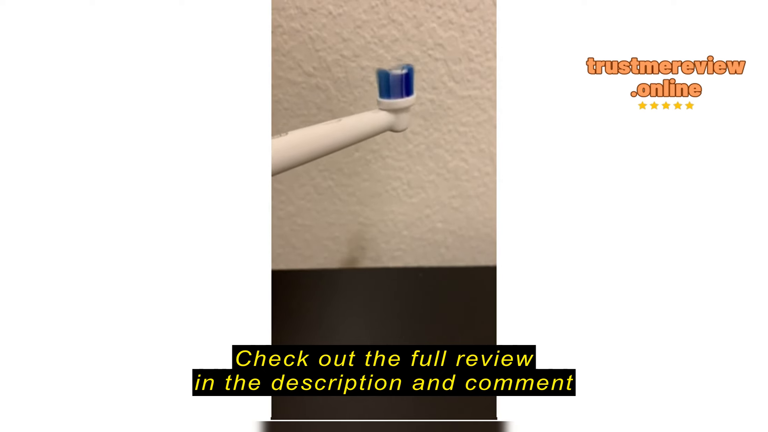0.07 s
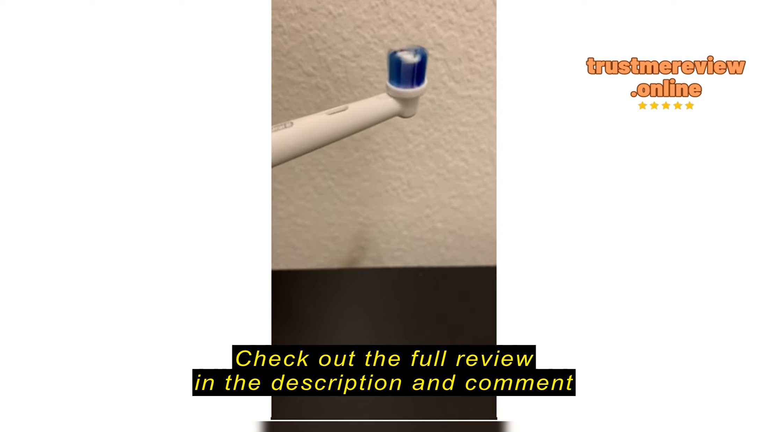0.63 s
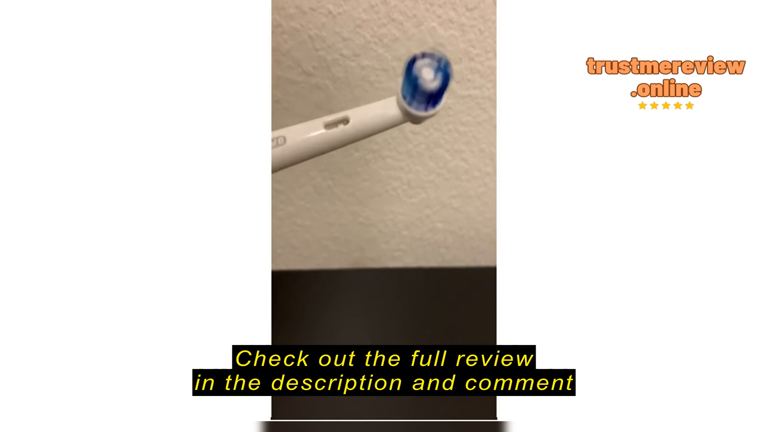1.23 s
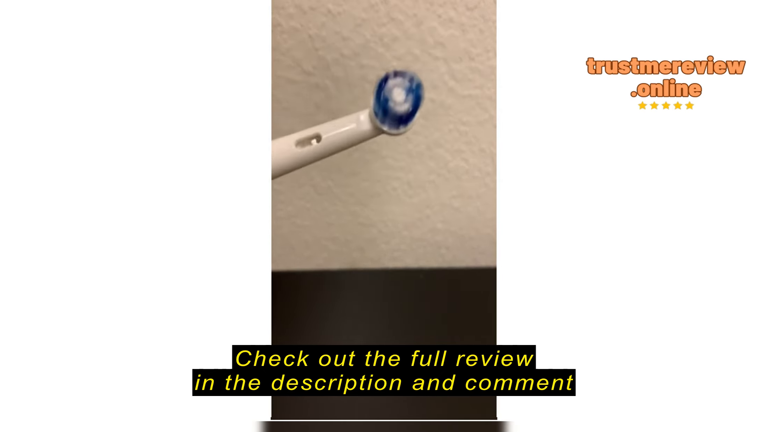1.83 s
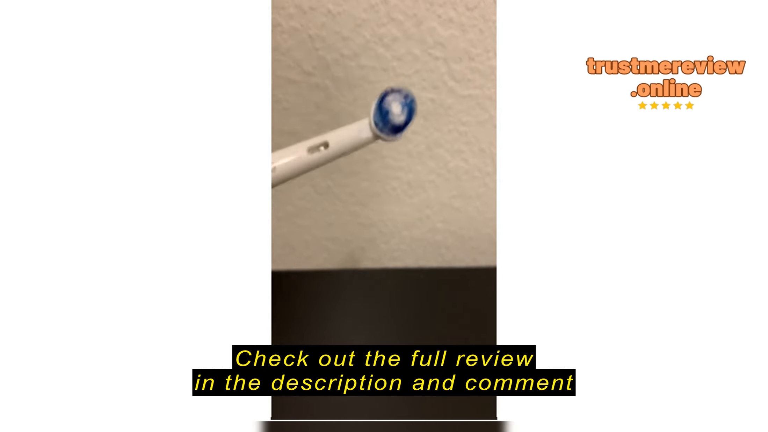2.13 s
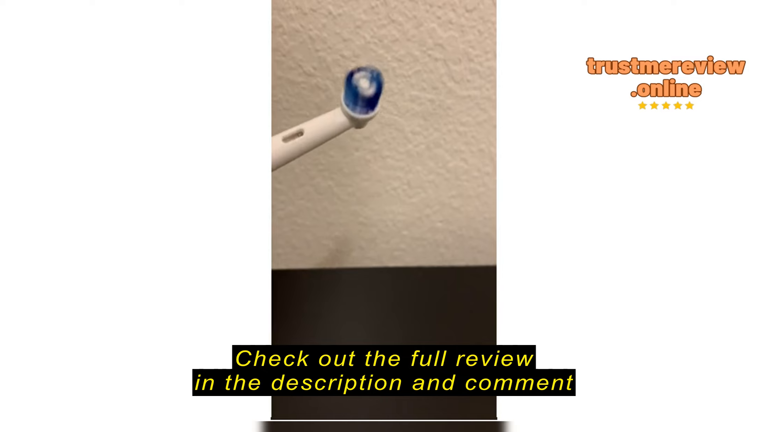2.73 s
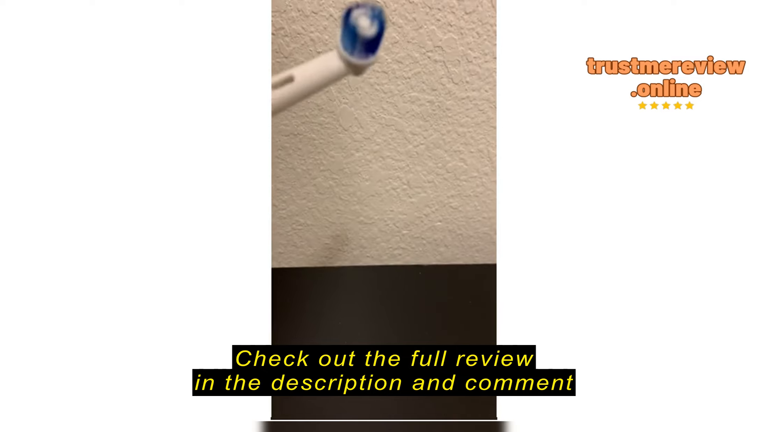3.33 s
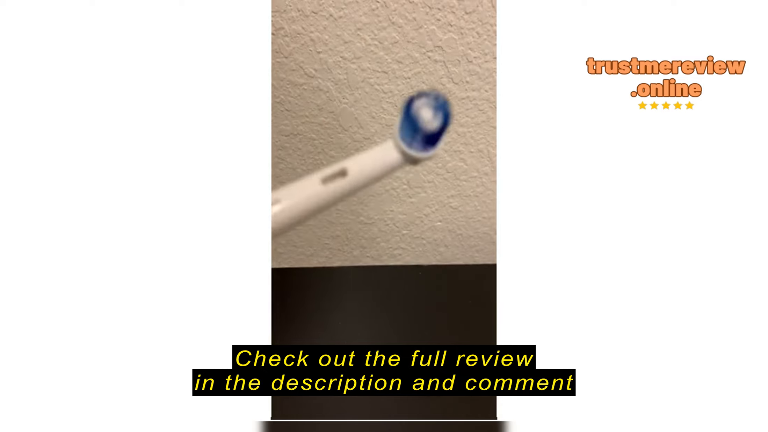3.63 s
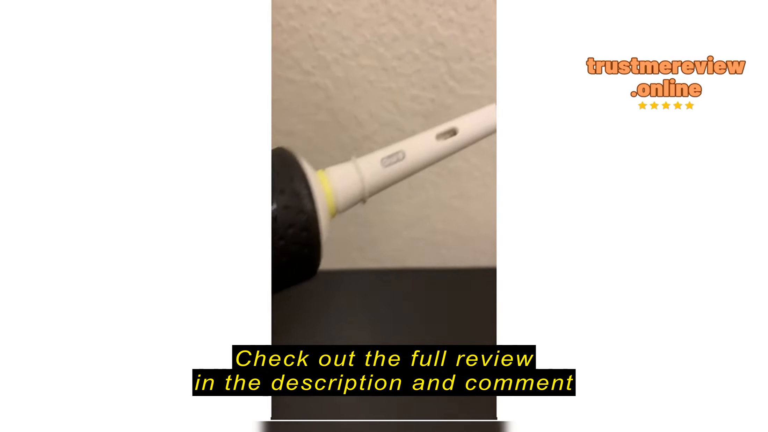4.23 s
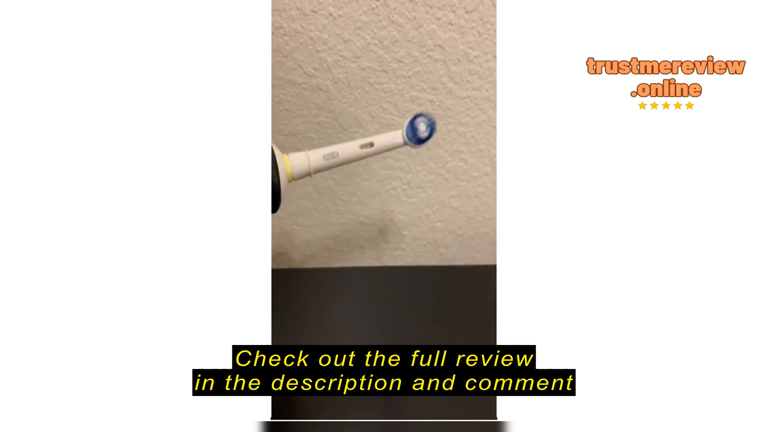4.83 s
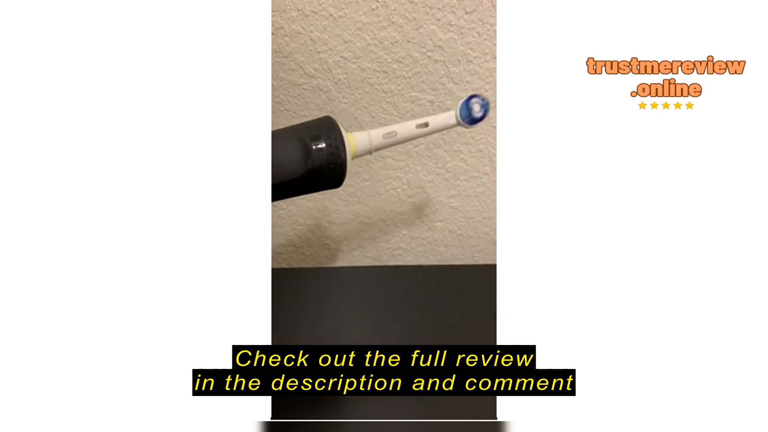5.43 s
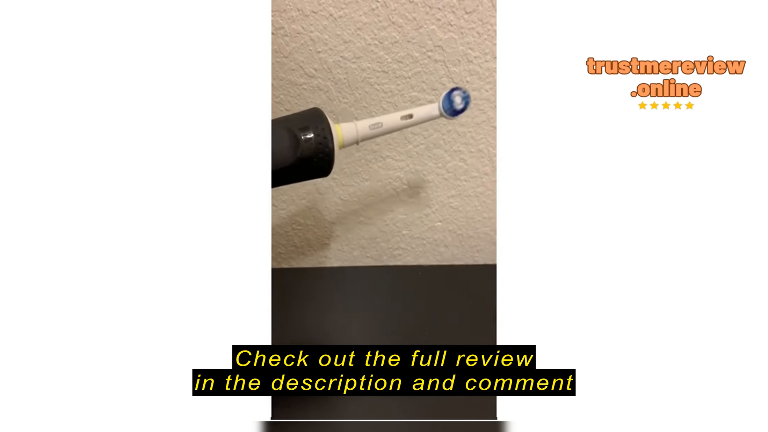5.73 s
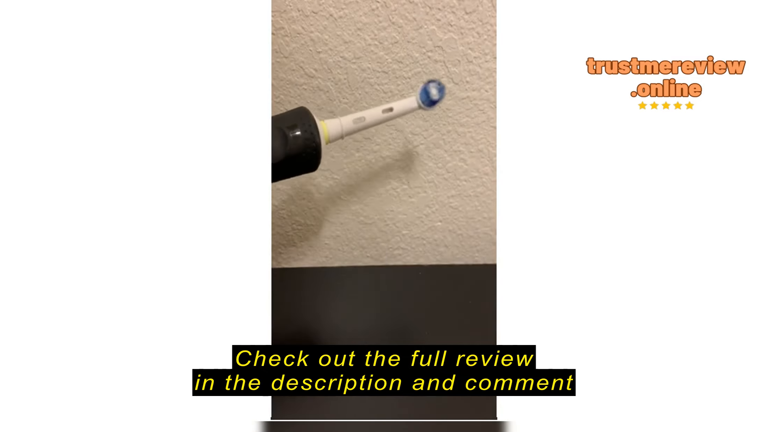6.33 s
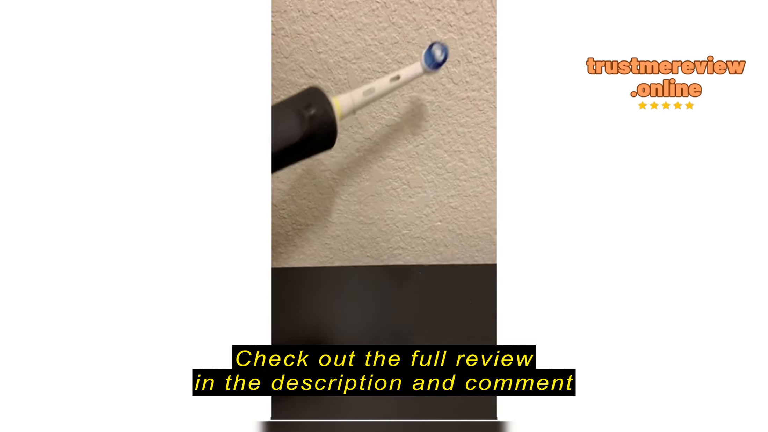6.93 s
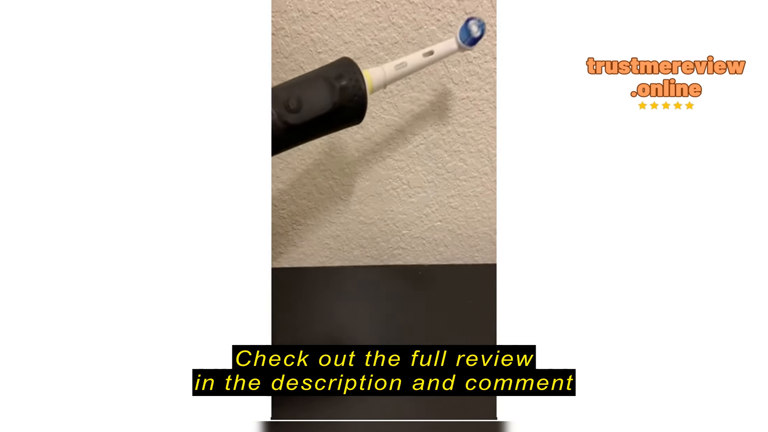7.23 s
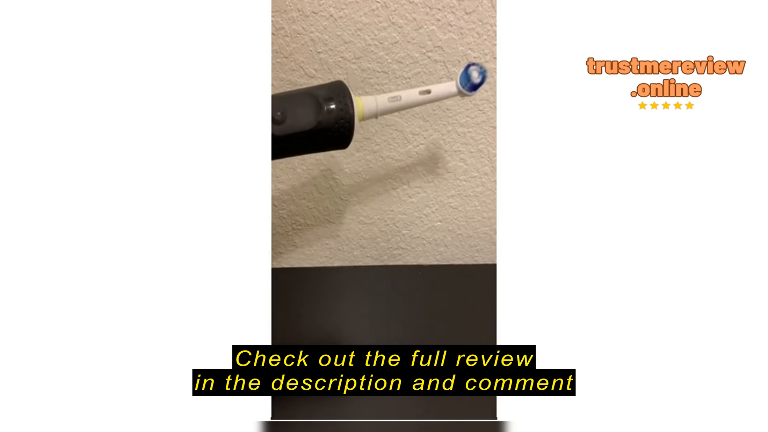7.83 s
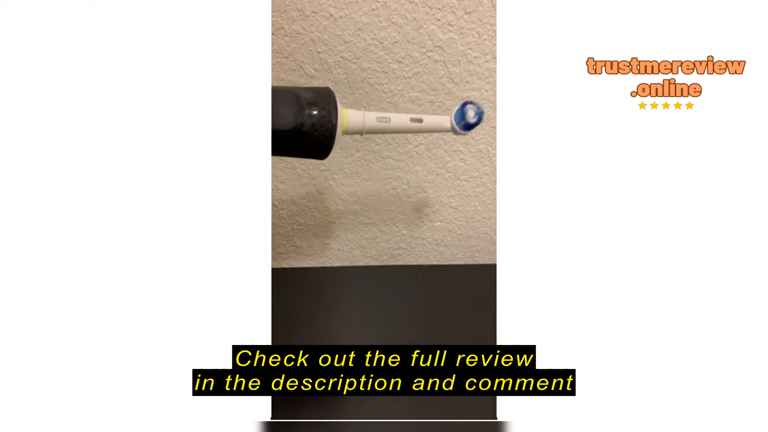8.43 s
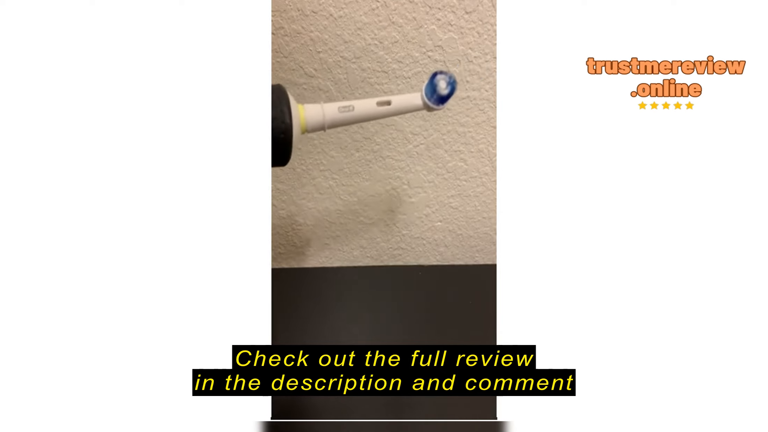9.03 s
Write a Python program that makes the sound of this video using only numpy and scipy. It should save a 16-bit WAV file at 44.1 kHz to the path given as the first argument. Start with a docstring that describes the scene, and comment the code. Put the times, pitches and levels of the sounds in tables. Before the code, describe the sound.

An electric toothbrush buzzes steadily up close, with a fast rattle and a thin hiss.

```python
"""An electric toothbrush runs in a hand, close to a phone, over low room rumble.
It spins up at once to about 72 turns a second: the handle hums at twice that rate, the housing buzzes
on higher orders, the linkage clatters in its play, stem and brush head ring, the bristles hiss.
It is slowly turned: the head faces the microphone from 1 s, the side from 3.5 s, the handle near 6 s.
From about 7.5 s the handle is held level, and sounds quieter."""
import sys
import numpy as np
from scipy import signal
from scipy.fft import rfft, irfft, next_fast_len
from scipy.io import wavfile
from scipy.ndimage import uniform_filter1d, map_coordinates

SR = 44100
rng = np.random.default_rng(int(sys.argv[2]) if len(sys.argv) > 2 else 0)


def master_out(mix):
    """Clip the mix to full scale and print it as 16-bit PCM to the path in sys.argv[1]."""
    frames = np.transpose(np.atleast_2d(mix))
    ceiling = np.clip(frames, -1, 1)
    pcm = np.round(ceiling * 32767).astype(np.int16)
    wavfile.write(sys.argv[1], SR, pcm)


N = 405279

# Drive speed. Each row: time in seconds, turns per second.
DRIVE_SPEED = [(0.3, 71.9), (1.0, 71.94), (1.3, 71.78), (1.55, 71.81), (1.8, 71.67), (2.1, 71.76),
               (2.3, 71.66), (2.55, 71.79), (3, 71.86), (3.75, 71.82), (4.65, 71.96), (5, 71.91),
               (5.9, 71.68), (6.2, 71.7), (6.55, 71.81), (8.3, 71.78), (8.6, 71.72), (9.19, 71.71)]
# What faces the microphone. Each row: time in seconds, aspect (0 head, 1 side, 2 handle, 3 held level).
ASPECT = [(0, 1.2), (1.0, 0.061), (2.8, 0.13), (3.5, 1.1), (4.1, 1.02), (5.3, 1.31), (6.2, 1.91),
          (7.1, 2.44), (7.7, 3.2), (9.2, 3.7)]
# How strongly the brush's sound reaches the microphone.
# Each row: time in seconds, gain in dB before each part's falloff factor.
LOUDNESS = [(0, 0), (1.8, 0.53), (4.3, -0.5), (6.1, -2.5), (7.1, -1.7), (7.7, -5), (8.5, -4.5), (9.2, -4.5)]
# Housing tones. Each row: order of the drive, then level in dB at aspects 0 to 3.
DRIVE_TONES = [(3, -59.0, -58.5, -58.0, -58.0), (4, -70.5, -61.5, -55.5, -58.5),
               (5, -69.0, -63.0, -55.0, -67.0), (6, -62.0, -81.0, -81.0, -69.0),
               (7, -49.0, -54.5, -48.5, -53.0), (8, -49.5, -51.0, -49.0, -53.5),
               (9, -72.5, -71.0, -63.5, -64.5), (10, -59.5, -62.5, -53.0, -56.0),
               (11, -64.5, -62.0, -60.0, -61.5), (12, -55.5, -56.0, -54.0, -55.0),
               (13, -58.5, -72.5, -64.0, -51.5), (14, -52.5, -61.5, -51.5, -60.0),
               (15, -54.0, -63.0, -51.0, -49.5), (16, -55.5, -66.5, -48.0, -54.5),
               (17, -48.5, -66.5, -56.0, -67.0), (18, -55.0, -53.5, -60.5, -58.5),
               (19, -59.5, -68.0, -57.0, -61.5), (20, -67.0, -61.5, -55.0, -51.0),
               (24, -47.0, -51.0, -59.5, -56.5), (25, -58.5, -55.5, -50.0, -52.0),
               (26, -51.0, -55.0, -50.5, -68.0), (27, -45.5, -50.5, -45.5, -46.0),
               (28, -61.5, -58.0, -48.5, -43.5), (29, -55.5, -50.0, -50.0, -52.0),
               (30, -58.0, -51.0, -53.5, -61.0), (31, -46.5, -54.0, -57.0, -51.0),
               (33, -58.5, -54.0, -68.0, -51.5), (34, -57.5, -50.0, -53.5, -53.0),
               (35, -60.0, -57.0, -49.5, -56.5), (36, -45.0, -61.5, -59.0, -52.5),
               (37, -50.5, -58.0, -50.5, -47.5), (38, -57.5, -55.5, -58.5, -48.5),
               (39, -51.0, -44.0, -56.0, -39.0), (40, -54.5, -48.5, -60.5, -52.5),
               (41, -57.5, -50.0, -57.5, -55.5), (42, -60.5, -50.0, -54.5, -55.5),
               (43, -56.5, -48.5, -50.5, -55.0), (44, -47.5, -49.0, -51.0, -57.5)]
# Linkage contacts. Each row: position in turns, then force in dB on head, rattle, bristles, housing.
CONTACTS = [(.18, -4, -3, 1, 0), (.34, -13, -11, -11, -11), (.69, -7, -.5, -4, -7), (.8, 1, -3, -2, 2),
            (.9, -1, 2.5, .5, -1)]
# Noise spectra. Each row: frequency in Hz, relative density in dB.
BEARING_SPECTRUM = [(100, -30), (180, -3), (260, -6), (400, -14.5), (520, 6), (650, -2.5), (850, -0.5),
                    (1250, 0.5), (1500, 0.5), (2200, -16.5)]
RASP_SPECTRUM = [(1100, -42), (1550, -0.5), (1800, 5), (2000, 7.5), (2350, 5), (2800, 4.5), (3200, 2),
                 (3700, 2), (5000, -46)]
RATTLE_SPECTRUM = [(2400, -54), (3300, -2), (3900, 8), (4500, 6.5), (5000, 0.5), (5500, 8), (5950, -1.5),
                   (7000, 2.5), (7550, 1.5), (8100, -0.5), (8600, -27.5), (9400, 1), (10500, -14),
                   (13000, -42)]
BRISTLE_SPECTRUM = [(6500, -18), (8000, 0), (8450, 7), (8950, 1.5), (9400, 3.5), (9950, 2), (10450, 4.5),
                    (11200, -1), (13000, -2), (15000, -0.5), (15800, -11)]
ROOM_SPECTRUM = [(20, -36), (40, -38), (62, 1.5), (85, -4.5), (125, 7), (180, 1.5), (260, -8.5), (500, -16),
                 (2000, -12.5), (16000, -32)]
# Rings of the hollow stem, and three shifting treble peaks. Each row: time in seconds, centre in Hz, relative
# level in dB.
STEM_RING = [(0.0, 2770, -37), (0.12, 2900, -30.5), (0.45, 2790, -38.5), (1.1, 2740, -39),
             (1.6, 3260, -37.5), (3.2, 3240, -43), (3.7, 2940, -39.5), (4.1, 2980, -37), (4.5, 2920, -38),
             (4.9, 2850, -38.5), (5.2, 3140, -46), (5.68, 3180, -34.5), (5.95, 3100, -53), (6.6, 2900, -46),
             (7.0, 2820, -42), (7.5, 2630, -45.5), (8.3, 2860, -42.5), (9.19, 2820, -49)]
PEAK_LOW = [(0, 4950, -9), (1.3, 5030, -19), (1.65, 5100, -8), (2.1, 4950, -6), (3.4, 4950, -12),
            (4.1, 5000, -16), (4.6, 5000, -17), (5.25, 5150, -3), (5.9, 5050, -13), (6.25, 4300, -5),
            (6.9, 4300, -17), (7.7, 4670, -12)]
PEAK_MID = [(0, 6320, -4), (1.0, 6490, -4), (1.8, 6150, -2), (3.1, 6250, -5), (3.7, 6350, -13),
            (4.2, 6200, -12), (4.55, 6330, -5.5), (5.3, 6300, -2), (6.1, 6170, -3), (6.3, 6300, -6),
            (6.7, 6250, -5), (7.05, 6230, -10.5), (7.33, 6630, -3.5), (7.5, 6930, -4), (7.6, 6200, -5),
            (7.75, 6300, 0.5), (8.1, 6450, -4), (8.35, 6350, -12)]
PEAK_HIGH = [(0, 7440, -19), (1.1, 7530, -6.5), (1.9, 7550, -2), (2.9, 7620, -5), (3.35, 7300, -5.5),
             (3.5, 6900, -5), (3.95, 6820, -0.5), (4.35, 6950, -17), (5.4, 7350, -15), (5.85, 7350, -1.5),
             (6.1, 7330, -0.5), (6.25, 7000, -8), (6.55, 7040, -7), (6.9, 6800, -4), (7.1, 7450, -19),
             (7.45, 7400, -4), (7.8, 7400, -18)]
# Brush head ring. Each row: time in seconds, level in dB.
HEAD_LEVEL = [(0, -41), (0.6, -35.5), (1.2, -29.5), (2.9, -28), (3.9, -33.5), (4.35, -42), (4.8, -34),
              (5.15, -52), (5.6, -40), (6.05, -48), (6.6, -38), (7.6, -47), (8.5, -40.5), (9.19, -45)]
# Brush head modes. Each row: centre in Hz, width in Hz, relative level in dB.
HEAD_MODES = [(3545, 210, 0), (3742, 60, -3)]
# Brush head radiation. Each row: frequency in Hz, relative gain in dB.
HEAD_RADIATION = [(2400, -20), (3100, -6), (3350, 1), (3820, 0), (3980, -6), (5500, -18)]
# Echoes off wall, desk and hand. Each row: delay in seconds, level in dB against the direct sound.
ECHOES = [(.0007, -18), (.0015, -14), (.0024, -13), (.0037, -13)]
# Stereo spread. Each row: frequency in Hz, angle from mid towards side in radians.
STEREO_SPREAD = [(60, 0.061), (140, 0.0047), (280, 0.18), (520, 0.32), (1000, 0.66), (2000, 0.51),
                 (2800, 0.56), (3650, 0.78)]
# Likeness of side and mid, 90 degrees apart in phase. Each row: frequency in Hz, likeness from -1 to 1.
STEREO_LIKENESS = [(150, .96), (600, -.6), (1100, -.15), (1600, -.15), (2000, .35), (2900, .4), (3400, .92),
                   (3800, .96), (4400, .55), (5600, .7), (7600, .75), (10000, .4)]
# Stereo balance. Each row: frequency in Hz, left minus right in dB.
STEREO_TILT = [(150, 0), (300, -0.8), (520, 0), (750, -1), (1200, -0.8), (2300, -1.3), (3300, 0)]

# Levels at aspects 0 to 3.
HUM_DB, BEARING_DB = (-47.5, -48, -45.5, -48), (-46.5, -47.5, -40.5, -41.5)
RASP_DB, LINKAGE_DB = (-38, -40, -39, -39), (-30.5, -29.5, -29, -30)
BRISTLE_DB = (-31, -31.5, -30.5, -32.5)

ON_HEAD, ON_RATTLE, ON_BRISTLES, ON_HOUSING = range(4)  # force columns of CONTACTS
SPIN_UP_S, START_DEFICIT_HZ, START_DEFICIT_DB = .055, 3.0, 6
START_TURN, HEAD_STOP_TURN = .67, .79
TOP_HZ = 15850
FRONT_ONLY = np.array([[1], [0]])  # dry channels: front, sides


def amp(db):
    return 10 ** (np.asarray(db) / 20)


def unit(x):
    """Each channel at rms 1."""
    return x / np.sqrt(np.mean(x ** 2, axis=-1, keepdims=True) + 1e-20)


def along(points, hz):
    """Interpolate (Hz, value) points on a log axis."""
    knots_hz, values = np.transpose(points)
    return np.interp(np.log(hz + 1), np.log(knots_hz + 1), values)


def curves(rows):
    """One value per sample for each column after the time."""
    times_s, *columns = np.transpose(rows)
    return [np.interp(np.arange(N) / SR, times_s, column) for column in columns]


def wobble(knots_per_s):
    """Smooth random curve."""
    coarse = np.arange(0, N + 256, 256)
    knots = rng.standard_normal(int(N * knots_per_s / SR) + 4)
    return np.interp(np.arange(N), coarse, map_coordinates(knots, [coarse * knots_per_s / SR]))


def filtered(x, response):
    """Apply a frequency response."""
    size = next_fast_len(N + SR // 4, real=True)
    return irfft(rfft(x, size) * response(np.fft.rfftfreq(size, 1 / SR)), size)[..., :N]


def coloured(x, spectrum):
    """Shape x by a spectrum; rms 1."""
    return unit(filtered(x, lambda hz: amp(along(spectrum, hz))))


def ring(x, hz, width_hz, order=2):
    """Resonance with a movable centre; rms 1. Order 1 starts sharply, order 2 has steep flanks."""
    carrier = np.exp(2j * np.pi * np.cumsum(hz * np.ones(N)) / SR)
    pole = np.exp(-np.pi * width_hz / SR)
    baseband = signal.lfilter([1], np.poly([pole] * order), x / carrier)
    return unit((baseband * carrier).real)


def spin_up():
    """Motor's shortfall from full run: 1 at first, soon 0."""
    return np.exp(-np.arange(N) / SR / SPIN_UP_S)


def facing(views_db):
    """Level in dB of a part as the brush is turned."""
    aspect, = curves(ASPECT)
    return np.interp(aspect, np.arange(len(views_db)), views_db)


def held(falloff, tremor_db):
    """Gain from the loudness curve (scaled by falloff), the unsteady hand and spin-up."""
    loudness_db, = curves(LOUDNESS)
    return amp(falloff * loudness_db + tremor_db * wobble(knots_per_s=7) - START_DEFICIT_DB * spin_up())


def patchy(x, depth_db):
    """Narrow bands of the noise swell and dip at random; rms 1."""
    bands = signal.stft(x, nperseg=1024)[2]
    field = rng.standard_normal(bands.shape[1:])
    for _ in range(2):
        field = uniform_filter1d(field, size=5, axis=0)
        field = uniform_filter1d(field, size=13, axis=1)
    gain = amp(depth_db * field / field.std())
    return unit(signal.istft(bands * gain, nperseg=1024)[1][:, :N])


def scrape(turns, repeat):
    """Friction: the power share 'repeat' is the same surface passing each turn, the rest is new."""
    size = 8192
    orders = np.arange(size // 2 + 1)
    in_band = orders < TOP_HZ / DRIVE_SPEED[-1][1]
    surface = irfft(np.exp(2j * np.pi * rng.random((2, len(orders)))) * in_band)
    same = unit(surface[:, (turns % 1 * size).astype(int)])
    fresh = unit(filtered(rng.standard_normal((2, N)), lambda hz: hz < TOP_HZ))
    return np.sqrt(repeat) * same + np.sqrt(1 - repeat) * fresh


def knocks(turns, column, decay_turns, slide_db):
    """Contact force: each contact presses and lets go once a turn, unevenly, over steady sliding."""
    aspect, = curves(ASPECT)
    power = amp(slide_db + aspect) ** 2  # sliding gains 1 dB per aspect step
    for position_turns, *levels_db in CONTACTS:
        since_turns = turns - position_turns + 2
        size_db = levels_db[column] + .6 * rng.standard_normal(1024)
        age = since_turns % 1 / decay_turns
        push = 2 * np.sqrt(age) * np.exp(-2 * age) * np.sqrt(np.e)  # peak 1
        power += (amp(size_db)[since_turns.astype(int)] * push) ** 2
    return np.sqrt(power)


def tones(turns, orders, waver_db, drift_rad):
    """Orders of the drive; their balance follows the aspect."""
    out = np.zeros((2, N))
    for order, *views_db in DRIVE_TONES:
        if order in orders:
            gain = amp(facing(views_db) + waver_db * wobble(2.984))
            phase = 2 * np.pi * (order * turns + rng.random((2, 1))) + drift_rad * wobble(1.925)
            out += gain * np.sqrt(2) * np.sin(phase)
    return out


def motor(turns):
    """The swinging mass shakes the handle twice a turn; the casing drones, the bearing slides."""
    swing = unit(np.sin(4 * np.pi * turns)) * FRONT_ONLY
    hum = amp(facing(HUM_DB)) * held(falloff=.5, tremor_db=.5) * swing
    drone = held(falloff=1, tremor_db=.64) * tones(turns, range(3, 10), waver_db=1.4, drift_rad=.22)
    growl = held(falloff=1, tremor_db=.7) * tones(turns, range(10, 22), waver_db=2.9, drift_rad=.3)
    sliding = patchy(coloured(scrape(turns, repeat=.02), BEARING_SPECTRUM), depth_db=2.6)
    bearing = amp(facing(BEARING_DB)) * held(falloff=1.93, tremor_db=1.3) * sliding
    return hum + drone + growl + bearing


def housing(turns):
    """The housing buzzes on high orders and rasps through the loaded half of each turn."""
    buzz = tones(turns, range(22, 45), waver_db=2.6, drift_rad=.2)
    force = knocks(turns, ON_HOUSING, decay_turns=.17, slide_db=-4)
    rasp = patchy(coloured(force * scrape(turns, repeat=.02), RASP_SPECTRUM), depth_db=2.6)
    return held(falloff=1, tremor_db=.93) * (buzz + amp(facing(RASP_DB)) * rasp)


def stem(turns):
    """The hollow stem rings in a band that shifts as the brush is turned."""
    hz, level_db = curves(STEM_RING)
    force = knocks(turns, ON_HOUSING, decay_turns=.14, slide_db=-12)
    return amp(level_db) * ring(force * scrape(turns, repeat=.35), hz, width_hz=320)


def stop_clicks(turns, width_turns, jitter_turns, scatter_db):
    """The head hits its stop once a turn, uneven in time and strength."""
    since_turns = turns - HEAD_STOP_TURN + 2
    turn = np.round(since_turns).astype(int)
    late, size = rng.standard_normal((2, turn.max() + 1))
    offset_turns = since_turns - turn - jitter_turns * late[turn]
    return unit(amp(scatter_db * size[turn]) * np.exp(-(offset_turns / width_turns) ** 2))


def brush_head(turns):
    """Rubbing and stop clicks ring two close plastic modes, loudest straight ahead."""
    level_db, = curves(HEAD_LEVEL)
    force = knocks(turns, ON_HEAD, decay_turns=.14, slide_db=-9)
    rubbing = unit(force * scrape(turns, repeat=.03))
    clicks = stop_clicks(turns, width_turns=.003, jitter_turns=.0006, scatter_db=.6)
    blows = amp(.5) * rubbing + clicks * FRONT_ONLY
    modes = sum(amp(db) * ring(blows, hz, width_hz, order=1) for hz, width_hz, db in HEAD_MODES)
    return amp(level_db) * held(falloff=.11, tremor_db=.4) * coloured(modes, HEAD_RADIATION)


def linkage(turns):
    """The shaft rattles in the hollow neck; three treble peaks come and go as the brush is turned."""
    force = knocks(turns, ON_RATTLE, decay_turns=.095, slide_db=-11)
    rattle = coloured(force * scrape(turns, repeat=.5), RATTLE_SPECTRUM)
    blows = force * scrape(turns, repeat=.52)
    rings = map(curves, (PEAK_LOW, PEAK_MID, PEAK_HIGH))
    peaks = sum(amp(level_db) * ring(blows, hz, width_hz=580) for hz, level_db in rings)
    return amp(facing(LINKAGE_DB)) * held(falloff=1.17, tremor_db=.81) * (rattle + peaks)


def bristles(turns):
    """The bristle disc hisses as it is flicked to and fro."""
    force = knocks(turns, ON_BRISTLES, decay_turns=.1, slide_db=-8)
    gain = amp(facing(BRISTLE_DB)) * held(falloff=.46, tremor_db=.86)
    hiss = coloured(force * scrape(turns, repeat=.15), BRISTLE_SPECTRUM)
    return gain * patchy(hiss, depth_db=1.7)


def reflections(x, sway_s=4e-5):
    """Short echoes ripple the treble; the ripples shift as the hand sways."""
    out = x.copy()
    oversampled = signal.resample_poly(x, 4, 1, axis=1)
    for delay_s, echo_db in ECHOES:
        lag_samples = SR * (delay_s + sway_s * wobble(2))
        read_at = np.clip(4 * (np.arange(N) - lag_samples), 0, 4 * N - 1)
        out += amp(echo_db) * oversampled[:, read_at.astype(int)]
    return out / np.sqrt(1 + sum(amp(echo_db) ** 2 for _, echo_db in ECHOES))


def room():
    """Steady low rumble."""
    return amp(-53) * coloured(rng.standard_normal((2, N)), ROOM_SPECTRUM)


def scene():
    """One drive moves every part; sound arrives from the front and the sides."""
    speed_hz, = curves(DRIVE_SPEED)
    turns = START_TURN + np.cumsum(speed_hz - START_DEFICIT_HZ * spin_up()) / SR
    buzz = motor(turns) + housing(turns) + stem(turns) + brush_head(turns)
    sizzle = reflections(linkage(turns) + bristles(turns))
    return buzz + sizzle + room()


def record(dry):
    """The phone widens its stereo: the treble swings between mid and side as frequency rises."""
    swing_from_hz, quarter_turn_hz = 3640, 2135

    def angle_rad(hz):
        return along(STEREO_SPREAD, hz) + np.pi / 2 * np.maximum(hz - swing_from_hz, 0) / quarter_turn_hz

    def side_response(hz):
        likeness = along(STEREO_LIKENESS, hz)
        return np.sin(angle_rad(hz)) * np.array([1j * likeness, np.sqrt(1 - likeness ** 2)])

    mid = filtered(dry[0], lambda hz: np.cos(angle_rad(hz)))
    side = filtered(dry, side_response).sum(axis=0)
    pair = np.array([mid + side, mid - side])
    tilted = filtered(pair, lambda hz: amp(np.outer([.5, -.5], along(STEREO_TILT, hz))))
    return filtered(tilted, lambda hz: hz < TOP_HZ)


dry = scene()
out = record(dry)
master_out(out)
```